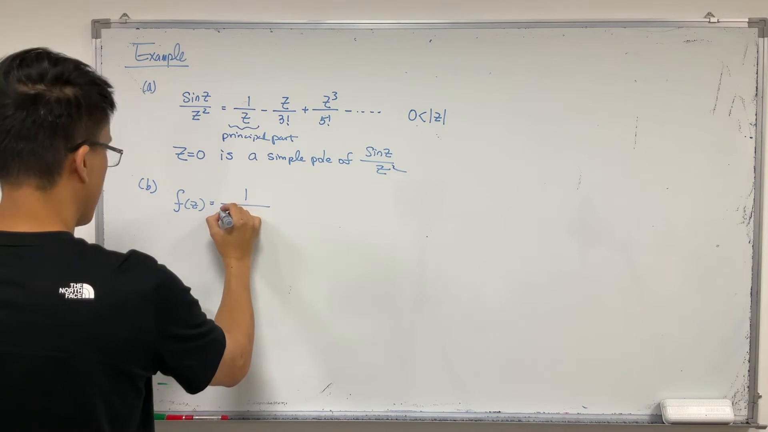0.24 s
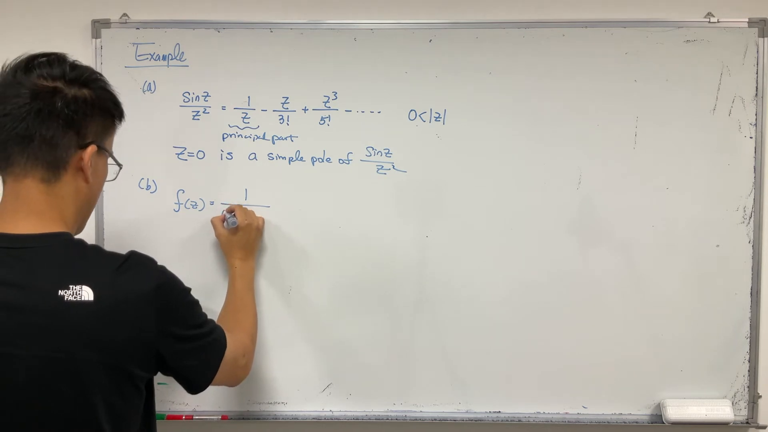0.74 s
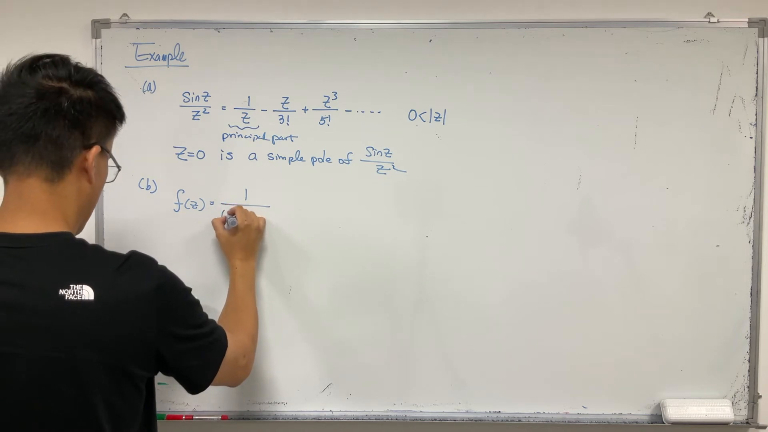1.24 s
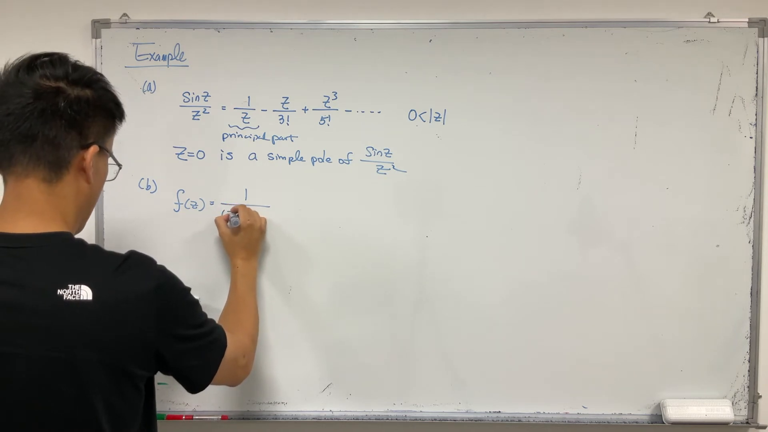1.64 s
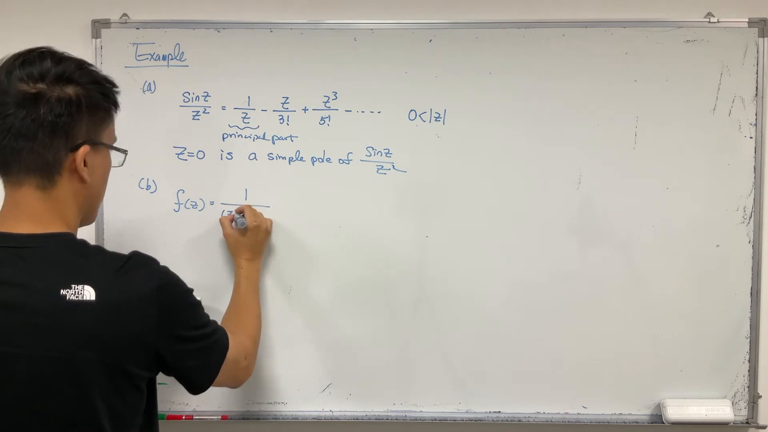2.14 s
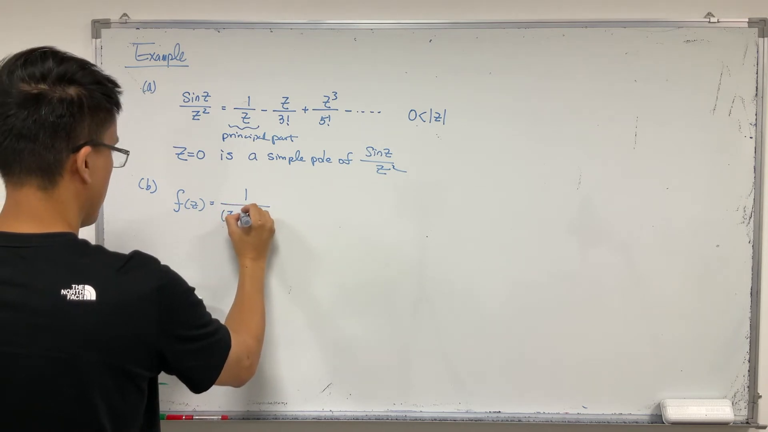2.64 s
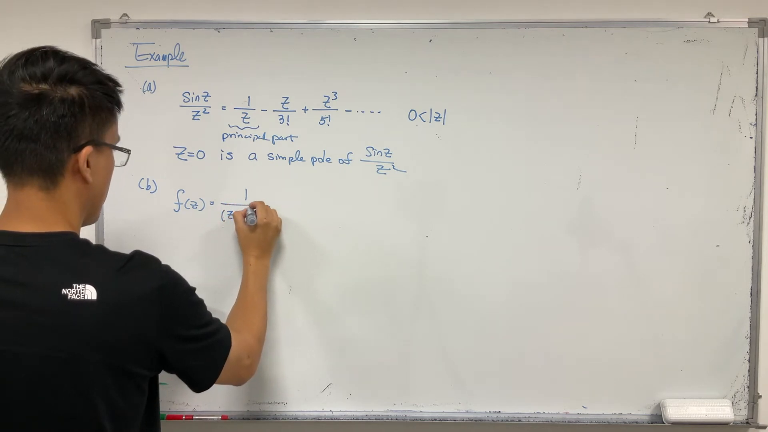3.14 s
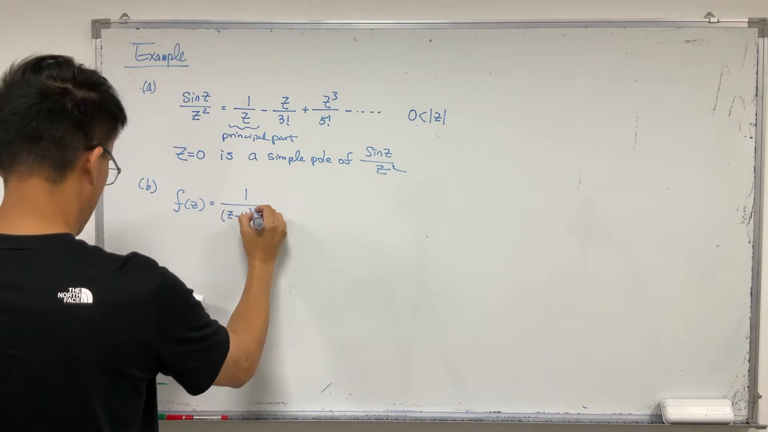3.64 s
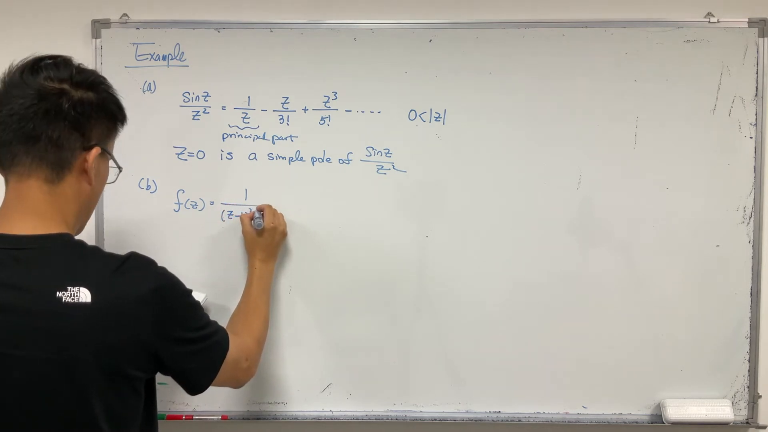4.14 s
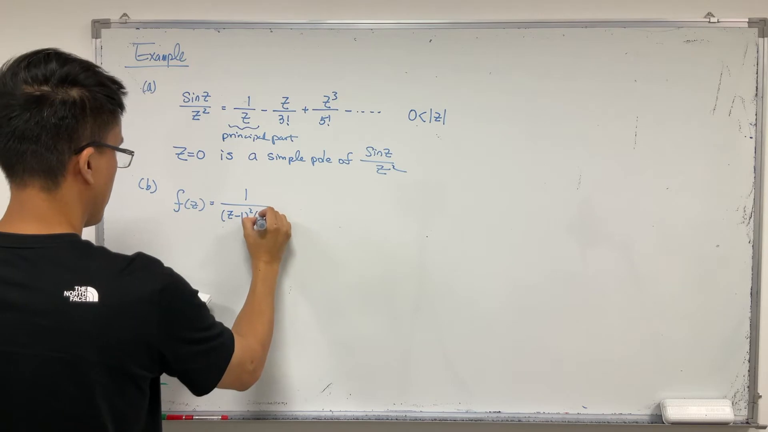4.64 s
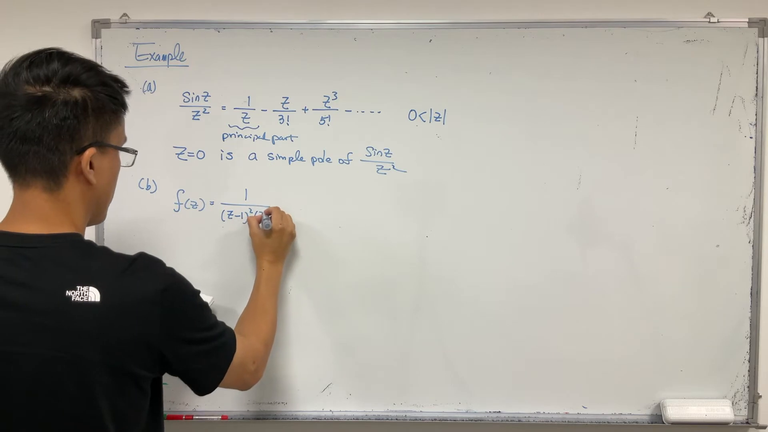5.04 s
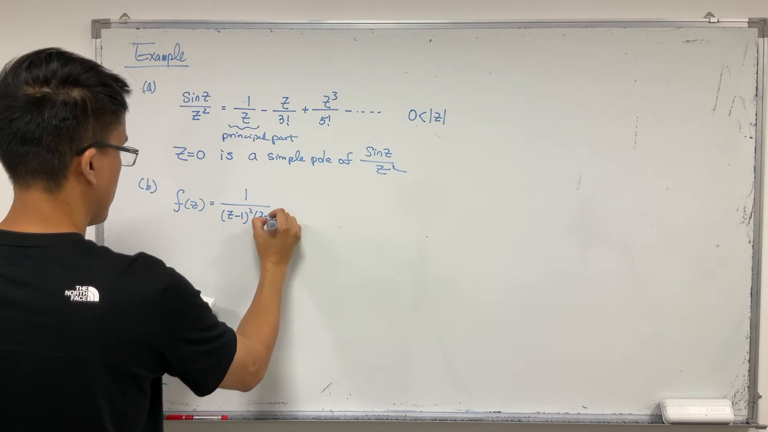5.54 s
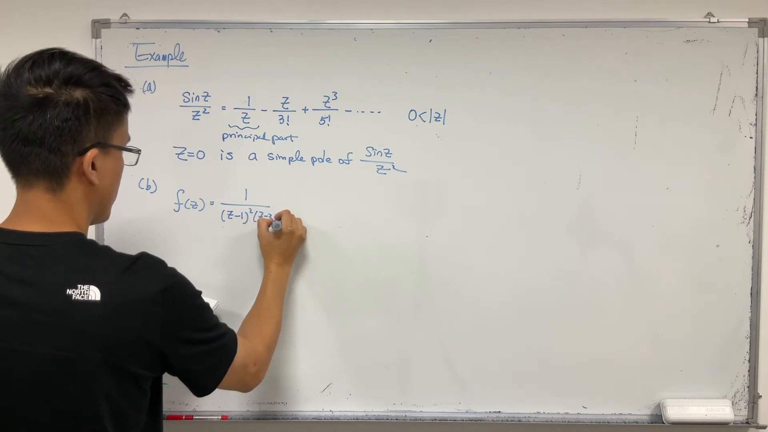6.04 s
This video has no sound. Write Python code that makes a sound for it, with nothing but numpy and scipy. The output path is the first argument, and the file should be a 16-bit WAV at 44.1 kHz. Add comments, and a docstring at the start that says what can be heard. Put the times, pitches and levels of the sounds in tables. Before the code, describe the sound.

A felt marker writes on a whiteboard in short, high squeaks with light ticks, over a faint room hum.

```python
"""A small room hums; from 0.5 s a felt marker writes a formula on a whiteboard. Its tip sticks and slips
about 2000 times a second: each stroke is a short gliding squeak, smeared by the bare walls.
The recorder's noise suppressor lets the room noise swell while the marker is busy. From 1.6 s the tip
also ticks as it lands or skips. A short low groan sounds in a pause at 4.2 s, the lifting tip whistles
twice just after 5 s, and the last squeak comes at 5.9 s."""
import sys
import numpy as np
from scipy import signal
from scipy.fft import rfft, irfft
from scipy.io import wavfile

SR = 44100
rng = np.random.default_rng(int(sys.argv[2]) if len(sys.argv) > 2 else 0)


def waveform_to_disk(signal):
    """Save audio, clipped to [-1, 1], as 16-bit WAV at the path in sys.argv[1]."""
    frames = np.transpose(np.atleast_2d(signal))
    scaled = np.clip(frames, -1, 1) * 32767
    samples = np.round(scaled).astype(np.int16)
    wavfile.write(sys.argv[1], SR, samples)


N = 277830
TIME = np.arange(N) / SR
BIN_HZ = np.fft.rfftfreq(N, 1 / SR)


def gain_of(db):
    """Decibels to amplitude."""
    return 10 ** (np.asarray(db) / 20)


def unit_rms(x):
    """Scales to rms 1."""
    return x / np.sqrt(np.mean(x ** 2) + 1e-20)


def curve_at(points, hz):
    """Interpolates (frequency, value) points on a log-frequency axis."""
    point_hz, value = np.transpose(points)
    return np.interp(np.log(hz + 1), np.log(point_hz), value)


def add(mix, start_s, sound):
    """Adds a sound to the mix in place."""
    part = mix[max(round(start_s * SR), 0):][:len(sound)]
    part += sound[:len(part)]


def filtered(x, spectrum):
    """Applies a (frequency, gain in dB) curve."""
    return irfft(rfft(x) * gain_of(curve_at(spectrum, BIN_HZ)), N)


def noise(spectrum):
    """Coloured noise, rms 1."""
    return unit_rms(filtered(rng.standard_normal(N), spectrum))


def drift(rate_hz):
    """Low-passed random modulation, rms 1."""
    return unit_rms(irfft(rfft(rng.standard_normal(N)) * np.exp(-(BIN_HZ / rate_hz) ** 2), N))


def fade(t, rise_s, fall_s):
    """Sine-squared attack, linear release."""
    attack = np.sin(np.pi / 2 * np.clip((t - t[0]) / rise_s, 0, 1)) ** 2
    return attack * np.clip((t[-1] - t) / fall_s, 0, 1)


# ventilation noise: (frequency [Hz], relative density [dB])
VENT_SPECTRUM = [(25, -32.5), (50, -8.5), (65, -7), (100, -17.5), (130, -4), (180, -6.5), (210, -7),
                 (320, -10), (450, -6), (500, -14.5), (600, -11.5), (740, -16), (1270, -21.5), (2800, -31),
                 (4200, -68)]
# faint hiss: (frequency [Hz], relative density [dB])
HISS_SPECTRUM = [(1650, -51.5), (2800, -6), (3370, -9), (4660, -14), (5770, -11), (6290, -18), (8020, -19),
                 (11000, -29.5), (15500, -45.5)]
# mains-driven fan hum before the swell: (frequency [Hz], level [dB])
FAN_PARTIALS = [(57.8, -72.5), (119, -72), (156, -71.5), (177, -68), (232.5, -70.5), (291.5, -73.5),
                (350, -69.5), (518, -73), (542, -88), (576, -73.5), (602, -98.5), (633, -75), (692, -90.5),
                (806, -89), (880, -85.5), (922, -80.5), (1150, -84.5), (1208, -82)]


def room_tone(swell_db, vent_db=-63, hiss_db=-84, hiss_follow=0.98, waver_rad=0.97):
    """Ventilation noise, hiss and a wavering fan hum, rising and sinking together."""
    hum = np.zeros(N)
    for hz, db in FAN_PARTIALS:
        phase = 2 * np.pi * (hz * TIME + rng.random())
        hum += gain_of(db) * np.sin(phase + waver_rad * drift(rate_hz=3))
    hiss = gain_of(hiss_db + hiss_follow * swell_db) * noise(HISS_SPECTRUM)
    vent = gain_of(vent_db) * noise(VENT_SPECTRUM)
    return gain_of(swell_db) * (vent + hum) + hiss


def suppressor_swell_db(x, threshold_db=-47, knee_db=6.5, open_db=6, memory_s=0.21, delay_s=0.047):
    """Noise suppressor gain for faint sound: rises while x stays loud, sinks in the pauses."""
    pole = np.exp(-1 / (memory_s * SR))
    level_db = 10 * np.log10(signal.lfilter([1 - pole], [1, -pole], x ** 2) + 1e-12)
    opening = np.clip((level_db - threshold_db) / knee_db, 0, 1)
    return open_db * np.interp(TIME - delay_s, TIME, opening)


# ring of the room: (frequency [Hz], t60 [s], level re direct sound [dB])
REVERB_BANDS = [(306, 0.2, -27), (2106, 0.34, -1.5), (3900, 0.3, -3), (5800, 0.22, -2.5),
                (7700, 0.38, -13.5), (11080, 0.12, -3), (15000, 0.22, -2)]
# first reflections off wall, writer and floor: (delay [s], gain [linear])
REFLECTIONS = [(.0046, 0.38), (.0083, 0.011), (.0127, .17), (.0171, 0.16)]


def room(x, gap_s=0.0013, build_s=0.0093, cutoff_s=0.21, near_s=0.06, tap_samples=20):
    """Bare walls return a few echoes, then a dense ring. Gives (direct and near sound, faint tail)."""
    taps = np.zeros(SR)
    slots = np.arange(0, SR - tap_samples, tap_samples)
    taps[slots + rng.integers(0, tap_samples, len(slots))] = rng.choice([-1, 1], len(slots))
    hz, t, bands = signal.stft(taps, SR, nperseg=256)
    band_hz, t60_s, wet_db = np.transpose(REVERB_BANDS)
    decay_per_s = np.log(1000) / curve_at(np.c_[band_hz, t60_s], hz)[:, None]
    wet = gain_of(curve_at(np.c_[band_hz, wet_db], hz))[:, None]
    unit_energy = np.sqrt(2 * decay_per_s * tap_samples / SR)
    bands = bands * wet * unit_energy * np.exp(-decay_per_s * t - (t / cutoff_s) ** 3)
    response = signal.istft(bands, SR)[1][:SR] * np.clip((TIME[:SR] - gap_s) / build_s, 0, 1)
    response[0] = 1  # direct sound
    for delay_s, gain in REFLECTIONS:
        response[round(delay_s * SR)] += gain
    early = np.exp(-(TIME[:SR] / near_s) ** 2)
    near = signal.fftconvolve(x, response * early)[:N]
    tail = signal.fftconvolve(x, response * (1 - early))[:N]
    return near, tail


# course of the groan: (time [s], pitch [Hz], relative level [dB])
GROAN_TRACK = [(4.226, 520.4, -54), (4.247, 540, -42.5), (4.267, 565, -39), (4.284, 560, -44.5),
               (4.299, 544, -39), (4.311, 561, -67.5)]


def groan(jitter=0.057, rough_hz=120, shake_db=1.5, octave_db=-21, trim_db=-1):
    """A rough, shaking low tone with a weak octave."""
    time_s, hz, db = np.transpose(GROAN_TRACK)
    pitch_hz = np.interp(TIME, time_s, hz) * (1 + jitter * drift(rough_hz))
    phase = 2 * np.pi * np.cumsum(pitch_hz) / SR
    gate = fade(np.clip(TIME, time_s[0], time_s[-1]), rise_s=0.003, fall_s=0.0026)
    level = gain_of(np.interp(TIME, time_s, db) + trim_db + shake_db * drift(rough_hz))
    return gate * level * (np.sin(phase) + gain_of(octave_db) * np.sin(2 * phase))


# the tip lifts: (time [s], length [s], starting pitch [Hz], level [dB])
LIFT_WHISTLES = [(5.045, 0.028, 11750, -62), (5.235, .008, 12600, -62)]


def whistles(jitter=0.021, jitter_hz=600, sag_hz_per_s=12000):
    """The barely touching tip gives a thin, unsteady, sinking tone."""
    out, waver = np.zeros(N), drift(jitter_hz)
    for start_s, length_s, hz, db in LIFT_WHISTLES:
        t = np.arange(0, length_s, 1 / SR)
        pitch_hz = (hz - sag_hz_per_s * t) * (1 + jitter * waver[round(start_s * SR):][:len(t)])
        tone = np.sin(2 * np.pi * np.cumsum(pitch_hz) / SR)
        add(out, start_s, gain_of(db) * fade(t, rise_s=0.0038, fall_s=0.0061) * tone)
    return out


# the tip lands or skips: (time [s], relative level [dB])
LANDINGS = [(1.552, -80), (2.415, -71.5), (2.476, -70), (3.088, -80), (3.218, -63), (3.238, -48),
            (3.391, -56), (4.823, -56), (4.949, -54), (5.003, -53.5), (5.193, -54.5), (5.323, -65),
            (5.877, -60.5), (6.166, -71.5)]
# contact noise of felt on board: (frequency [Hz], gain [dB])
CONTACT_SPECTRUM = [(200, 6), (900, 8.5), (1800, 6.5), (2700, -16), (3600, 6), (5200, -2.5), (7000, -17),
                    (10000, -23), (12500, -33.5), (15000, -51)]


def ticks(t60_s=0.05, trim_db=4):
    """Each landing of the soft tip is a dull, quickly damped snap."""
    envelope, t = np.zeros(N), np.arange(SR // 10) / SR
    for start_s, db in LANDINGS:
        add(envelope, start_s, gain_of(db + trim_db) * np.exp(-np.log(1000) * t / t60_s))
    return filtered(envelope * rng.standard_normal(N), CONTACT_SPECTRUM)


def bite(t, build_s, fade_db):
    """Overtone envelope: builds as the tip digs in, changes by fade_db late in the stroke as it lifts."""
    return np.clip(t / build_s, 1e-4, 1) * gain_of(fade_db * (t / t[-1]) ** 5.2)


def slip_rate_hz(t, turn_s, glide_s, land_hz, turn_hz, lift_hz):
    """The slip rate runs straight to the turn of the stroke, then eases toward its lift-off value."""
    approach = np.minimum(t / turn_s, 1)
    eased = np.sin(np.pi / 2 * np.clip((t - turn_s) / glide_s, 0, 1)) ** 2
    return land_hz + (turn_hz - land_hz) * approach + (lift_hz - turn_hz) * eased


def slip_phase(hz, waver, jitter=0.0015, slow_jitter=0.011, glide_jitter=0.0027, steady_hz=1850):
    """The slips grow uneven as the tip slows down or changes speed."""
    slowness = np.maximum(1 - hz / steady_hz, 0)
    glide_per_s = abs(np.gradient(hz)) * SR / hz
    unevenness = jitter + slow_jitter * slowness + glide_jitter * np.minimum(glide_per_s / 8, 1)
    return 2 * np.pi * np.cumsum(hz * (1 + unevenness * waver)) / SR


# pen and board resonances under the fundamental: (frequency [Hz], gain [dB])
FUNDAMENTAL_RESPONSE = [(1350, -3), (1530, 6.5), (1620, -7.5), (1780, -4.5), (1900, 4), (2000, 1.26),
                        (2080, 1.7), (2200, 1.7), (2300, -13.5)]
# pen and board radiation of the overtones: (frequency [Hz], gain [dB])
OVERTONE_RESPONSE = [(2800, 16), (3500, 7.5), (4250, -1.5), (4550, -17.5), (5050, 4.5), (5700, 1),
                     (6400, -6.5), (6720, -18), (7300, -1), (8000, -3.5), (8900, -11.5), (10100, -5.5),
                     (11150, -9.5), (12100, -13), (13100, -31.5), (14100, -22.5), (14900, -47.5),
                     (15500, -38.5)]
# marker strokes, levels relative; the bump is a brief swell or dip of the fundamental;
# turn and bump count from the stroke's start, glide from the turn:
# (time [s], length [s], turn [s], glide [s], landing pitch [Hz], turn pitch [Hz], lift-off pitch [Hz],
#  fundamental [dB], bump time [s], bump gain [dB], overtones [dB], overtone slope [dB/octave],
#  overtone build-up [s], overtone fade at lift-off [dB])
MARKER_STROKES = [ (.464, .079, 0.037, 0.035, 1456, 1803, 2057, -43.5, 0.041, 8.5, -48.5, 6.5, 0.048, -34),
                  (.961, 0.017, 0.0077, 0.012, 1835, 2123, 2240, -53.5, 0, 12, -86, -6, .009, -28),
                  (1.102, 0.045, 0.015, 0.033, 1416, 1658, 2028, -32, 0.019, -3.5, -48.5, -6.5, 0.012, 0.5),
                  (1.215, 0.055, 0.023, 0.027, 2030, 1652, 2080, -40, .036, 7, -52, -16, .0055, -27),
                  (1.586, 0.024, 0.012, .007, 1950, 2170, 2140, -66, 0, 5.5, -96, -2, .009, -28),
                  (2.25, 0.031, 0.0073, 0.013, 1940, 2192, 2320, -56, 0.0066, 10.5, -93, -6, 0.0078, -28),
                  (2.481, .1, 0.022, 0.071, 1858, 2015, 1957, -37.5, 0.012, -1.5, -44.5, 6.5, .017, -11.5),
                  (2.553, .023, .013, 0.014, 1995, 1875, 1390, -47, 0.0049, 12, -45.5, -5, 0.0067, -25),
                  (2.731, 0.019, .011, 0.0074, 1984, 2224, 1964, -56.5, 0.02, 21.5, -63, 0, 0.0027, -34),
                  (2.761, 0.079, 0.034, .028, 2092, 2059, 2007, -44.5, 0.042, 23.5, -51, 10.5, 0.0076, -14.5),
                  (3.091, 0.039, 0.0059, 0.025, 1810, 1706, 2137, -42.5, 0.014, 7, -53, -11, 0.0023, -63),
                  (3.16, 0.06, 0.042, .028, 1986, 1878, 1066, -43, 0.042, 10, -49.5, 2.5, 0.0087, 3.5),
                  (3.24, 0.069, 0.028, 0.072, 1771, 2155, 1638, -34.5, .041, -1, -44.5, -5.5, 0.0075, -21),
                  (4.146, .036, 0.014, .026, 1414, 1803, 2130, -38.5, .004, -1.5, -47, 4.5, 0.017, -47),
                  (4.457, 0.036, 0.014, 0.0066, 1665, 2063, 2212, -47, 0.015, 10.5, -49.5, -10.5, 0.018, -30),
                  (4.528, 0.032, 0.02, 0.0049, 2025, 1967, 2015, -42.5, 0.034, 19, -50.5, 7, 0.0081, -30),
                  (4.602, .078, 0.0143, 0.0388, 1917, 1683, 2150, -36.5, 0.039, 2.5, -48.5, -2, .0025, -6.5),
                  (4.827, .024, 0.0069, 0.013, 1935, 2152, 2185, -35.5, 0.018, -2, -48, -.5, 0.01, -27),
                  (5.004, 0.037, 0.015, 0.014, 1830, 1768, 2155, -37.5, 0.012, 10.5, -49, -3.5, 0.0021, -32),
                  (5.194, 0.053, .015, .016, 1877, 1963, 2143, -41.5, .019, 5.5, -50, -13.5, .003, -17),
                  (5.264, 0.039, 0.0073, .034, 2104, 1830, 2032, -43, 0.01, 11, -45, -2, 0.027, -29),
                  (5.321, .015, 0.0088, .0066, 1900, 1774, 1180, -51, 0.0029, 8.5, -54, -11, .005, -17),
                  (5.346, .027, .0084, 0.0086, 1890, 1920, 2120, -37.5, .017, 1, -48.5, -7, 0.0057, -28),
                  (5.416, 0.05, 0.021, 0.037, 1978, 1729, 2085, -35, 0.036, 4.5, -50.5, -5.5, 0.0038, 2.5),
                  (5.885, 0.091, 0.012, 0.032, 1710, 1800, 2136, -37.5, .014, 10, -41, -0.5, 0.054, -47)]


def squeaks(flutter_db=0.78, flicker_db=2.5, bump_width_s=0.01, stall_hz=1840, stall_db_per_octave=12,
            overtone_trim_db=-1, top_hz=14200, harmonics=9):
    """Stick-slip of the felt tip: harmonics glide through pen and board resonances, wavering with grip."""
    out = np.zeros(N)
    waver, grip, flicker = drift(rate_hz=400), drift(rate_hz=200), drift(rate_hz=220)
    offsets = rng.integers(N, size=(len(MARKER_STROKES), harmonics + 1))
    for stroke, offset in zip(MARKER_STROKES, offsets):
        (start_s, length_s, turn_s, glide_s, land_hz, turn_hz, lift_hz,
         fundamental_db, bump_s, bump_db, overtone_db, slope_db, build_s, fade_db) = stroke
        t = np.arange(0, length_s, 1 / SR)
        at = round(start_s * SR) + np.arange(len(t))
        hz = slip_rate_hz(t, turn_s, glide_s, land_hz, turn_hz, lift_hz)
        phase = slip_phase(hz, waver[at])
        bump = np.exp(-((t - bump_s) / bump_width_s) ** 2)
        tone = gain_of(fundamental_db + bump_db * bump + curve_at(FUNDAMENTAL_RESPONSE, hz)) * np.sin(phase)
        # slow slips have weaker, duller overtones
        stall_octaves = np.maximum(np.log2(stall_hz / hz), 0)
        base_db = overtone_db + overtone_trim_db - stall_db_per_octave * stall_octaves
        tilt_db_per_octave = slope_db - 11 * stall_octaves
        dug_in = bite(t, build_s, fade_db)
        for k in range(2, harmonics + 1):
            octaves = np.log2(k / 2)
            level_db = base_db + tilt_db_per_octave * octaves + curve_at(OVERTONE_RESPONSE, k * hz)
            level_db += flicker_db * flicker[(at + offset[k]) % N]
            envelope = dug_in ** (1 + 0.92 * octaves)  # higher overtones come later and go sooner
            felt_lowpass = 1 / (1 + (k * hz / top_hz) ** 10)
            tone += envelope * gain_of(level_db) * felt_lowpass * np.sin(k * phase)
        contact = fade(t, rise_s=0.0052, fall_s=0.0034)
        add(out, start_s, tone * gain_of(flutter_db * grip[at]) * contact)
    return out


def scrape(trim_db=-20):
    """Sliding felt hisses faintly, more where the squeak is rich in overtones."""
    envelope = np.zeros(N)
    for start_s, length_s, *_, overtone_db, _, build_s, fade_db in MARKER_STROKES:
        t = np.arange(0, length_s, 1 / SR)
        add(envelope, start_s, gain_of(overtone_db + trim_db) * bite(t, build_s, fade_db))
    return envelope * noise(CONTACT_SPECTRUM)


def scene(tail_db=-7.5, tail_follow=1.46):
    """The marker in the room; in pauses the suppressor holds down the room noise and the reverb tail."""
    near, tail = room(squeaks() + scrape() + whistles() + ticks() + groan())
    swell_db = suppressor_swell_db(near)
    tail_gain = gain_of(tail_db + tail_follow * swell_db)
    return (near + tail_gain * tail + room_tone(swell_db))[None]


def record(dry):
    """The recorder's band limit: a steep low-pass at 15.7 kHz."""
    lowpass = signal.firwin(511, 15700, window=("kaiser", 9), fs=SR)
    return signal.oaconvolve(dry, lowpass[None], "same")


dry = scene()
out = record(dry)
waveform_to_disk(out)
```